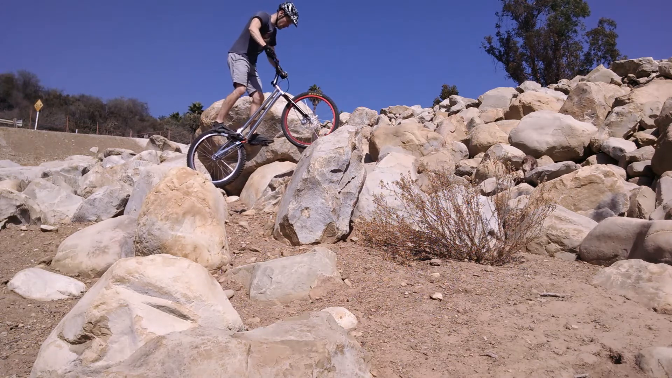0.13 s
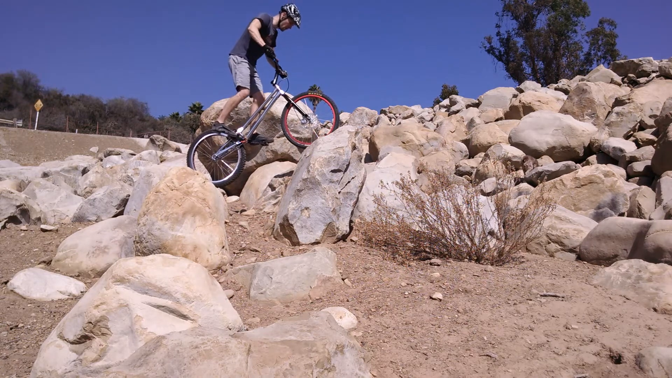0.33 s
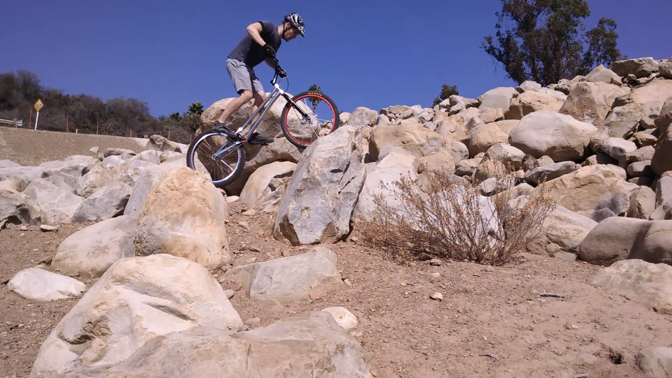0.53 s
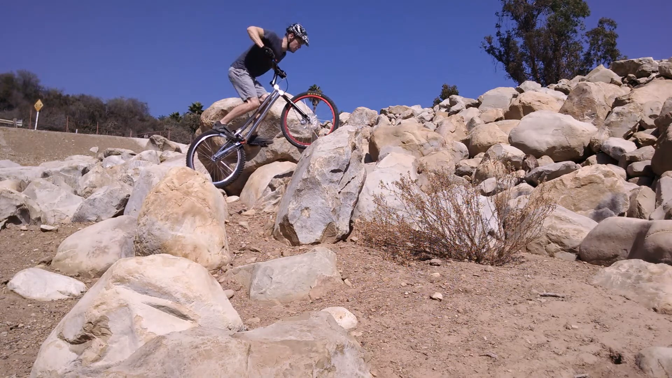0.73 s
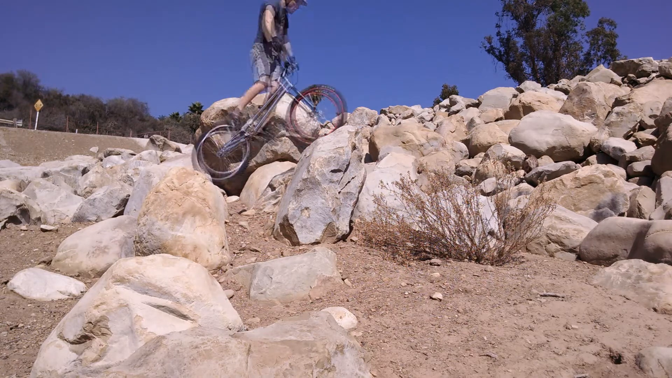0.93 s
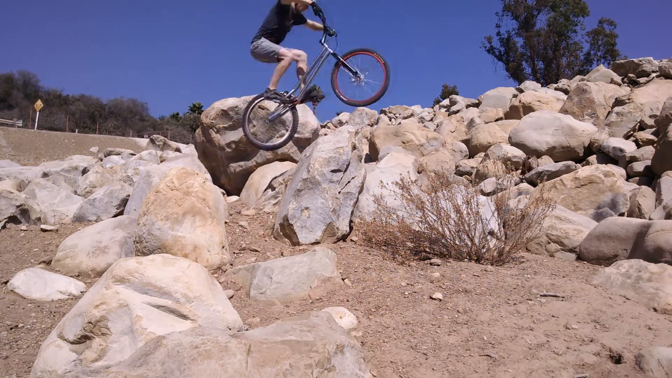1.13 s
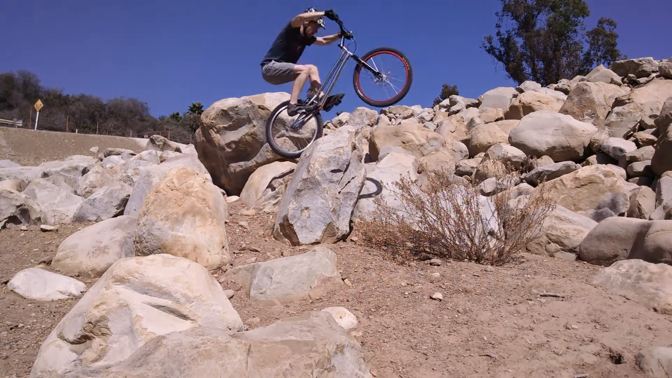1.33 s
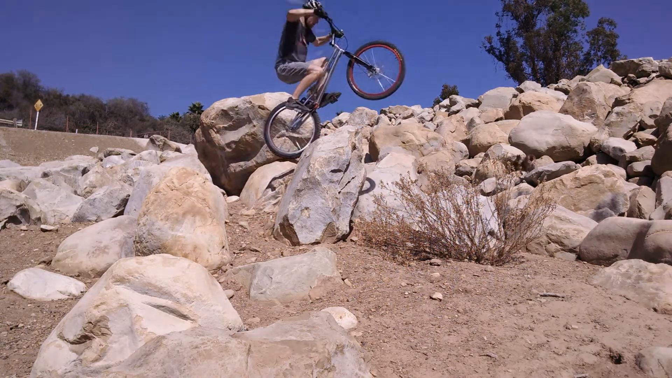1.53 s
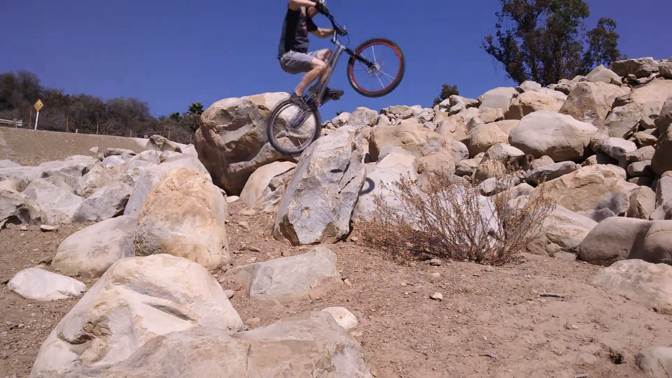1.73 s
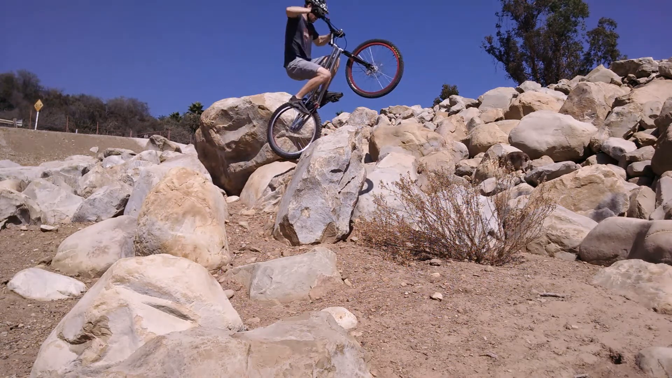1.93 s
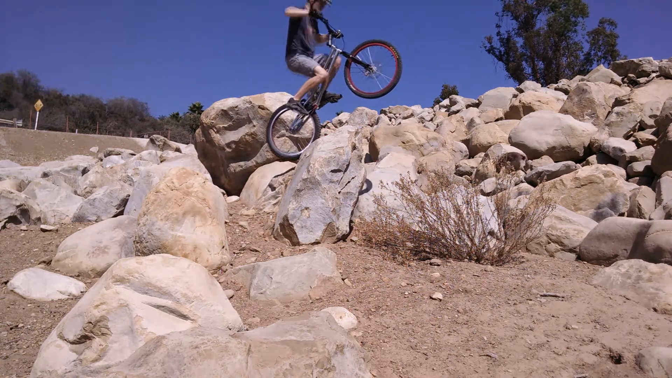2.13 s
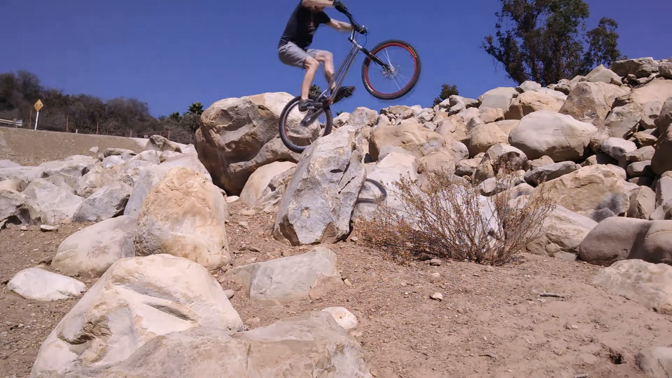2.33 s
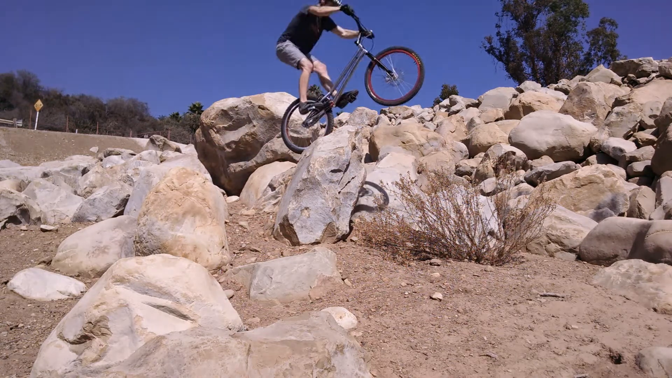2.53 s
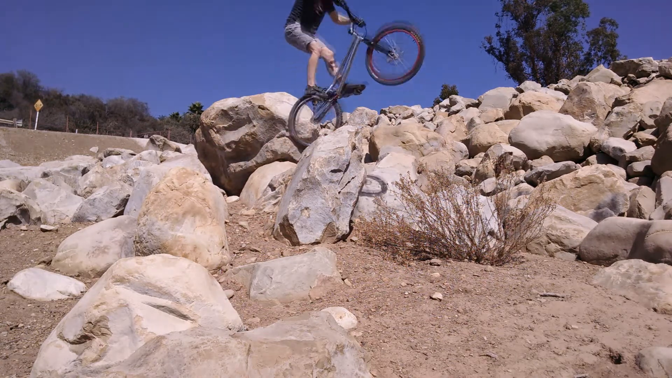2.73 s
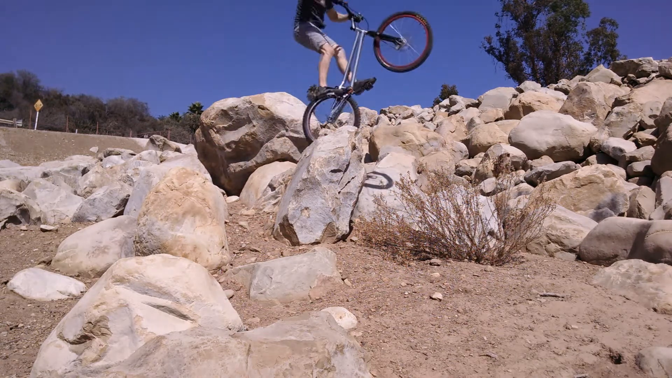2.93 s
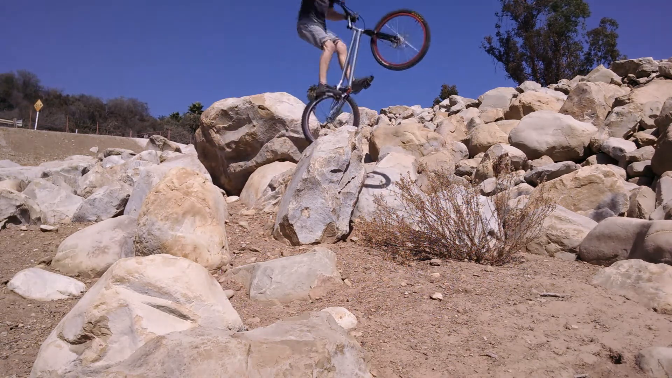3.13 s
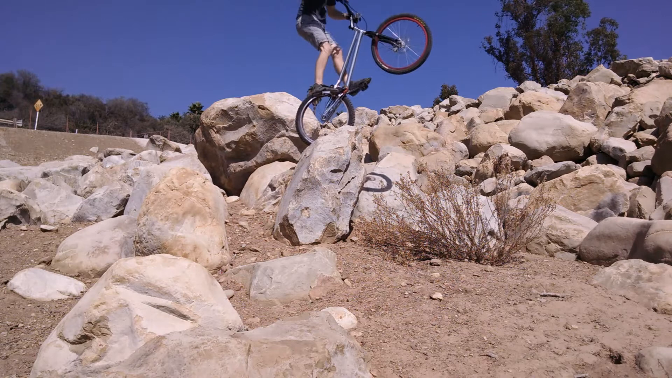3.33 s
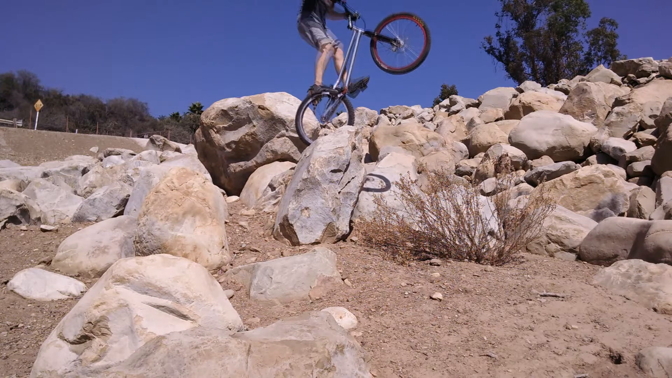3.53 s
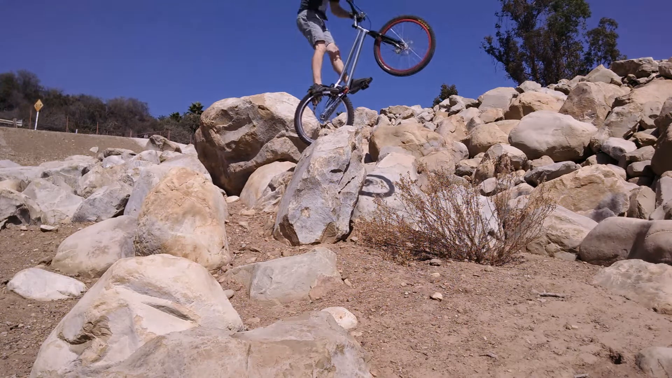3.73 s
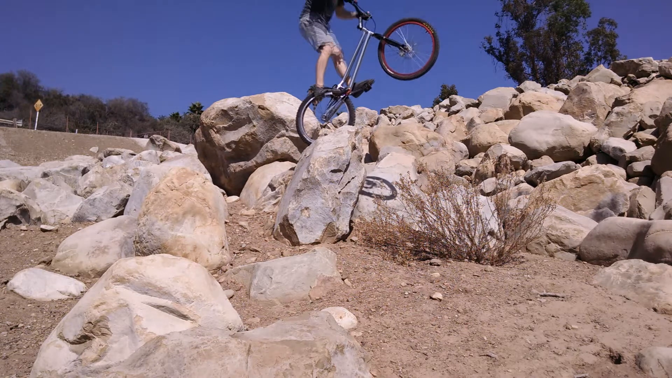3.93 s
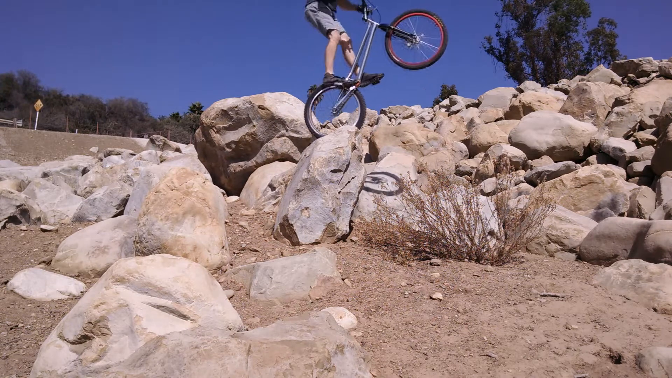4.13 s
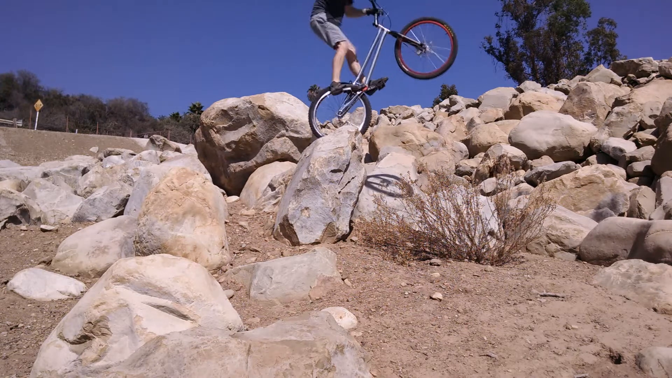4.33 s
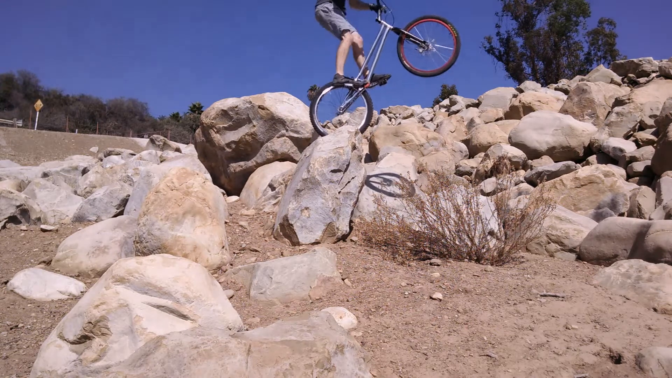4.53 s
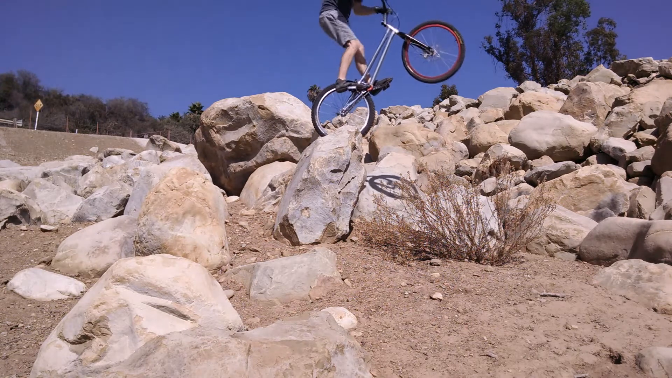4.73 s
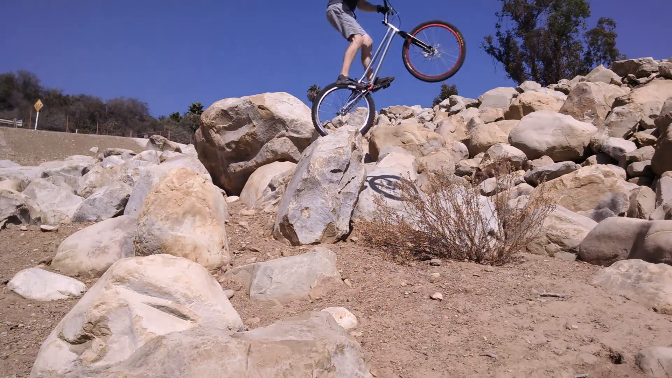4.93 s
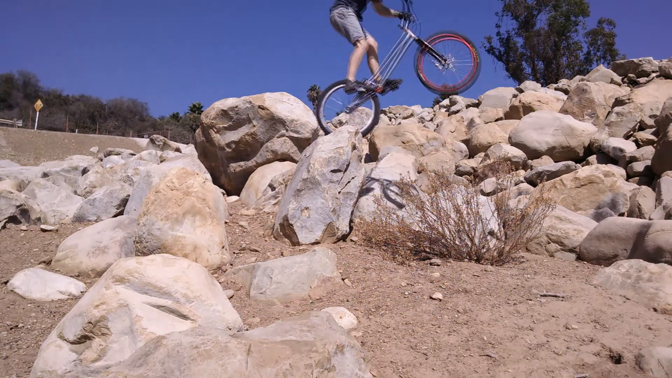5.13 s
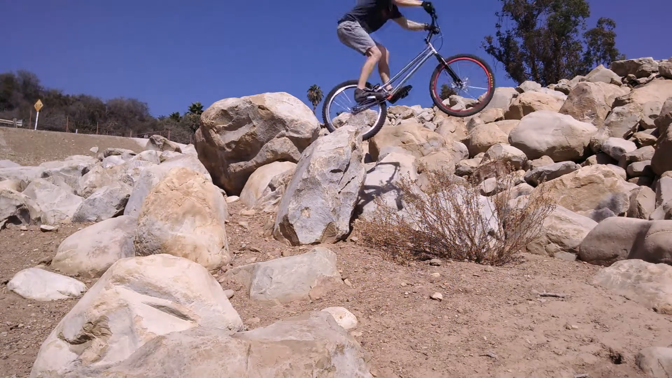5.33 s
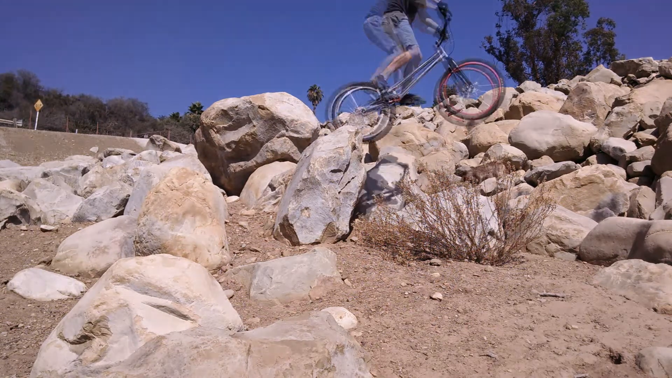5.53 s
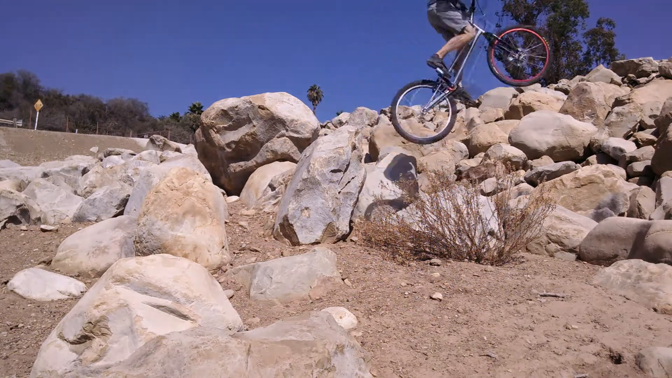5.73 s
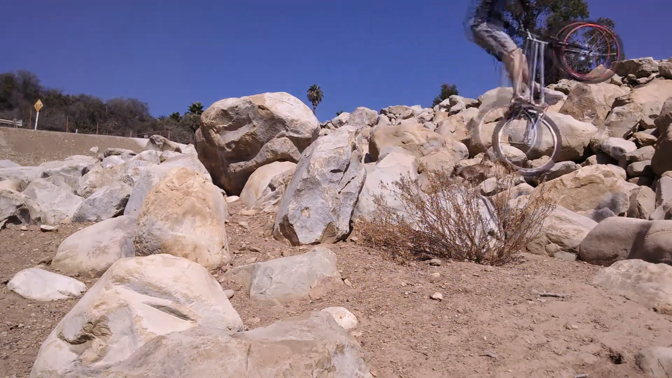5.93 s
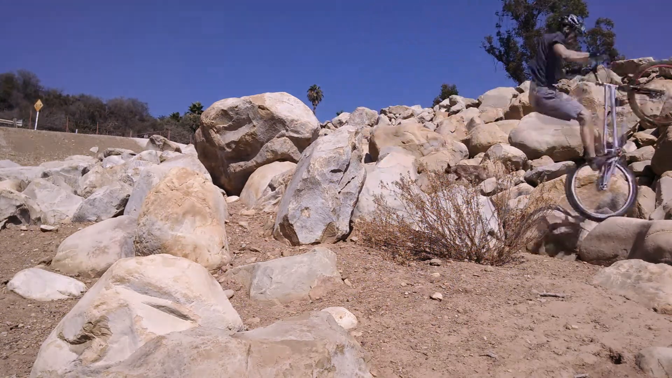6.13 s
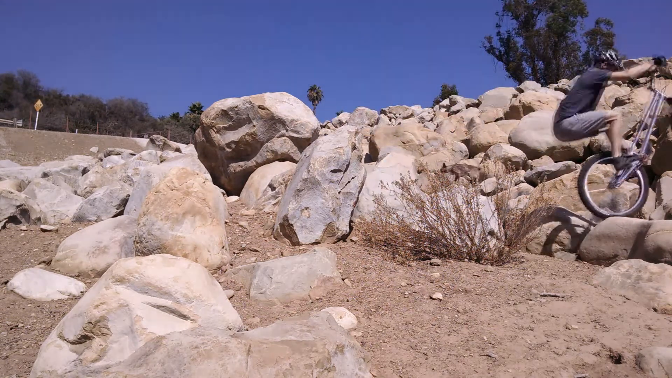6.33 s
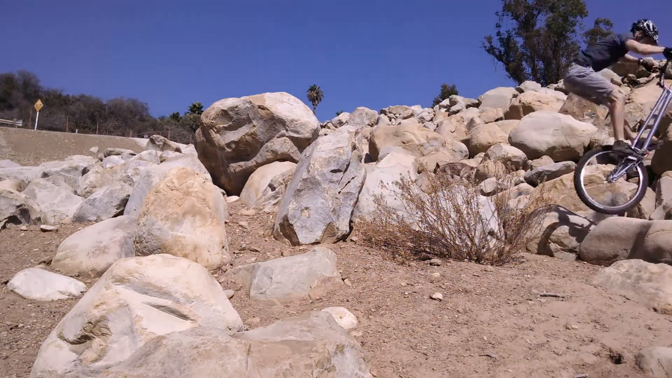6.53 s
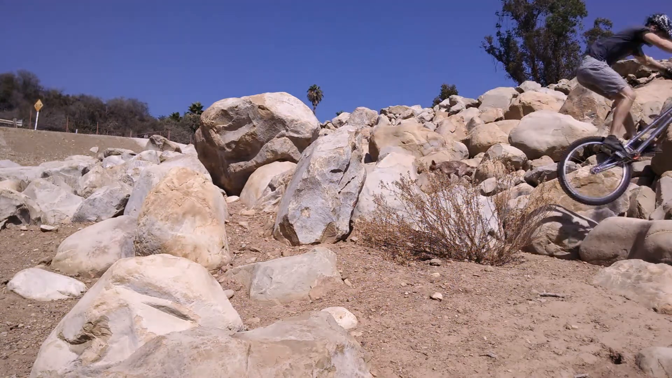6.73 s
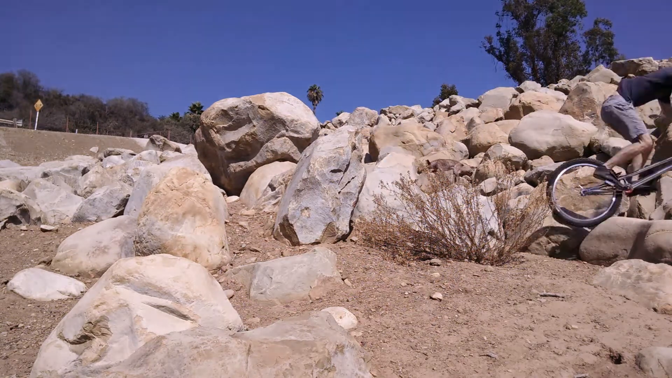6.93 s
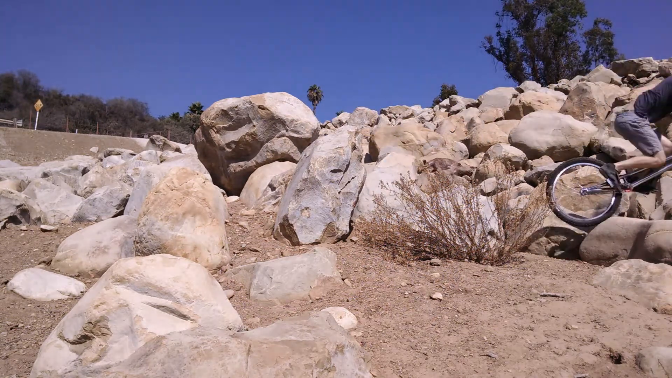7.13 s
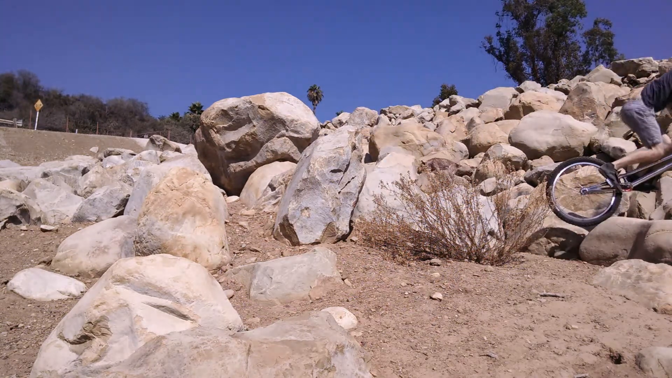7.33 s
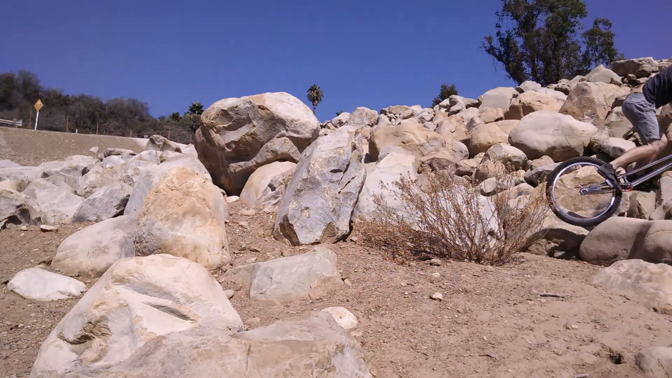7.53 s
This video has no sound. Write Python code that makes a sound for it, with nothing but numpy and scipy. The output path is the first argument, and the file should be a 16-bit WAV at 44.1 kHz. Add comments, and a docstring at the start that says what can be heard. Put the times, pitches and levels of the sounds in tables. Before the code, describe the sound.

Open rocky ground, with a quiet distant hum and low wind thumps, strongest in the first second and again around 2 to 2.7. At about 1 second small hollow tyre taps begin, then quick bright freewheel clicks run into a hard two-tone brake knock at 1.36, with the frame ringing on. Soft scuffs follow at 1.9 and 2.3, a firm tap at 2.47, and a stronger rubbery scrape at 2.8. Ratchet clicks lead to another stuttering brake bark at 3.03. Isolated ticks follow; from 4.1 to 4.35 a scuff, wavering groans and softer brake honks. A tap sounds at 4.7, a cluster of clicks at 5.2 to 5.4, and a loud snap at 5.77. A fast whir precedes the landing at 6.1, with brake chirps, crack and grit. Small taps and sparse ticks fade into near quiet until a tap and sharp, higher brake squawk at 7.1, ringing off by 7.5.

```python
"""Trials bicycle among boulders

A trials bicycle hops up boulders in open country. Freewheel pawls strike their ratchet as clicks and
whirs, the tyre scuffs on rock as noise through resonances, and small taps and groaning tones join in.
The rim brake sticks and slips in short pitched knocks; modal resonators keep the frame ringing.
Boulders answer with a short diffuse echo. Wind noise buffets two microphone ports against each other
over a quiet far hum."""
import sys
import numpy as np
from scipy import signal
from scipy.fft import rfft, irfft, next_fast_len
from scipy.io import wavfile
from scipy.ndimage import map_coordinates

SR = 44100
rng = np.random.default_rng(int(sys.argv[2]) if len(sys.argv) > 2 else 0)


def to_wav(sig):
    """Store sig (one row per channel, or 1-D mono) as 16-bit WAV at the path in sys.argv[1].

    Samples outside -1..1 are clipped; the rate is SR.
    """
    pcm = np.clip(np.atleast_2d(sig), -1, 1) * 32767
    pcm = np.round(pcm).astype(np.int16)
    wavfile.write(sys.argv[1], SR, pcm.T)  # frames by channels


N = 333616


def amp(db):
    """The decibel law: 20 dB is a factor of ten in amplitude."""
    return 10 ** (np.asarray(db) / 20)


def unit(x):
    """Normalisation by mean power: the result has rms 1."""
    return x / np.sqrt(np.mean(x ** 2) + 1e-20)


def along(points, hz):
    """Interpolation on a logarithmic frequency axis through (Hz, value) points."""
    f, v = np.transpose(points)
    return np.interp(np.log(hz + 1), np.log(f + 1), v)


def curves(rows, outside=None):
    """Linear interpolation in time: one value per sample for each column after the seconds."""
    s, *cols = np.transpose(rows)
    return [np.interp(np.arange(N) / SR, s, c, outside, outside) for c in cols]


def wobble(rate):
    """Band-limited fluctuation: a smooth curve through random knots, rate of them a second."""
    knots = rng.standard_normal(int(N * rate / SR) + 4)
    return map_coordinates(knots, [np.arange(N) * rate / SR])


def filtered(x, response):
    """Linear filtering: the spectrum of x times a response of frequency, padded against wrap-around."""
    m = next_fast_len(N + SR // 2)
    return irfft(rfft(x, m) * response(np.fft.rfftfreq(m, 1 / SR)), m)[..., :N]


def noise(spectrum):
    """Spectral shaping: white noise coloured by (Hz, dB) points and scaled to rms 1."""
    return unit(filtered(rng.standard_normal(N), lambda hz: amp(along(spectrum, hz))))


def ports(mid, side):
    """Sum-and-difference stereo: left and right are mid plus and minus side."""
    return np.array([mid + side, mid - side])


def pair(mid_spectrum, side_spectrum, side_db):
    """Partial coherence: one noisy source reaches both ports, partly alike and partly independent."""
    alike = 0.39  # share of the side's power that is the mid's noise turned a quarter cycle
    white, other = rng.standard_normal((2, N))
    turned = np.sqrt(alike) * filtered(white, lambda hz: 1j) + np.sqrt(1 - alike) * other

    def colour(x, spectrum):
        return unit(filtered(x, lambda hz: amp(along(spectrum, hz))))

    return ports(colour(white, mid_spectrum), amp(side_db) * colour(turned, side_spectrum))


def decaying(strikes, t60):
    """Exponential decay: every strike starts an envelope that falls 60 dB in t60 seconds."""
    return signal.lfilter([1], [1, -amp(-60 / (t60 * SR))], strikes)


def wind():
    """Turbulence: lumpy low noise with single pops, pressing mostly oppositely on the two ports."""
    # Each row: time in seconds, level in dB.
    gusts = [(0.0, -40.5), (0.2, -34.5), (0.4, -44), (0.6, -37.5), (0.85, -41.5), (1.2, -53.5), (1.4, -43),
             (1.6, -60), (2.0, -38.5), (2.6, -40.5), (2.8, -49), (3.4, -50), (4.0, -59), (5.0, -59.5),
             (5.2, -53), (5.4, -57), (6.8, -63.5), (7.56, -59.5)]
    # Each row: frequency in Hz, relative density in dB per Hz.
    buffet = [(12, -27.5), (20, 6), (87, -4), (115, -12), (157, -22), (223, -26), (474, -46.5), (500, -37),
              (650, -65.5), (1100, -120)]
    # Single eddies. Each row: centre in seconds, level in dB, pitch in Hz.
    eddies = [(0.136, -15, 138), (0.244, -23, 60), (0.468, -26.5, 90), (0.634, -31, 90), (0.749, -29.5, 91),
              (1.994, -31, 90), (2.078, -32, 88), (2.251, -27, 79), (2.499, -34, 80), (2.685, -27.5, 94),
              (3.263, -36, 70), (3.643, -32.5, 70)]
    lumps = amp(curves(gusts)[0]) * unit(amp(3.3 * wobble(2.9)))
    t = np.arange(N) / SR
    pops = np.zeros(N)
    for s, db, hz in eddies:
        bell = np.exp(-((t - s) * hz * 1.44) ** 2)  # about one cycle long
        pops += amp(db) * bell * np.sin(2 * np.pi * hz * (t - s))
    side = lumps * noise(buffet) + pops
    mid = amp(-17) * lumps * noise(buffet) - amp(-20) * side
    return ports(mid, side)


def air():
    """Diffuse ambience: independent mid and side noises make a far hum that sinks after 6.1 s."""
    # Each row: time in seconds, level in dB before the drift.
    hum = [(0.0, -65), (0.95, -65), (1.1, -62.5), (5.52, -63), (6.09, -65), (6.49, -75.5), (7.56, -69.5)]
    # Sum of the ports, then their difference. Each row: frequency in Hz, relative density in dB per Hz.
    hum_mid = [(15, -40), (25, -7.5), (70, -8), (120, -3.5), (256, -9.5), (503, -3.5), (1130, -10.5),
               (2410, -16.5), (3080, -22), (4250, -17), (5880, -24), (9570, -23.5), (12900, -30.5),
               (14000, -33.5), (15300, -24.5), (15900, -50.5)]
    hum_side = [(120, -34), (200, -6.5), (601, -11), (1300, -23.5), (1480, -35.5), (1810, -24), (2910, -17),
                (4430, -24.5), (9750, -26.5), (14300, -30.5), (16000, -50)]
    drift_db = 1.0 * wobble(9)  # a small random drift
    level = amp(curves(hum)[0] + drift_db)
    return level * ports(amp(0.5) * noise(hum_mid), amp(-2) * noise(hum_side))


def tyre(x):
    """Modal resonance: broad second-order resonances of tyre and rim, alternating in sign."""
    # Each row: centre in Hz, width in Hz, gain in dB.
    modes = [(613, 42, 1.5), (925, 100, 1.5), (1254, 170, 2), (1467, 120, 3.5), (1743, 120, 1),
             (2190, 340, -5)]

    def response(f):
        total = 0
        for k, (c, w, db) in enumerate(modes):
            total = total + (-1) ** k * amp(db) * 1j * f * w / (c * c - f * f + 1j * f * w)
        return total

    return filtered(x, response)


def scuffs():
    """Friction noise: uneven slips of the tread excite the tyre's resonances and loosen grit."""
    # Each row: start in seconds, loudest moment in seconds, level in dB, grit over it in dB,
    # t60 of the rubber's fade in seconds.
    dragged = [(0.945, 0.947, -60.5, -6.5, 1.2), (1.88, 1.92, -52.5, -6, 0.23),
               (2.25, 2.271, -46.5, -14.5, 0.16), (2.27, 2.3, -49, -20, 0.084),
               (2.755, 2.788, -32.5, -15, 0.11), (2.78, 2.801, -34.5, -41, 0.11),
               (4.11, 4.186, -39.5, -7, 0.35), (5.545, 5.545, -59.5, -8, 3.1), (6.088, 6.089, -40, 6, 0.12),
               (6.245, 6.262, -52.5, -5, 0.24), (6.676, 6.711, -74, 5, 0.088), (6.99, 7.06, -74, 8, .1),
               (7.066, 7.085, -52, 7, .15)]
    # Each row: frequency in Hz, relative density in dB per Hz.
    grit_spectrum = [(2500, -14.5), (3400, -5), (4300, -3.5), (7000, -11), (11000, -20), (15000, -31)]
    start_db, grit_lingers = -27, 1.83  # where a drag swells from; the grit's fade over the rubber's
    chance = rng.random(N) < 600 / SR  # 600 slips a second on average
    slips = decaying(chance * amp(1.5 * rng.standard_normal(N)), t60=.015) + .6
    rubber = unit(tyre(slips * rng.standard_normal(N)))
    grit = unit(slips) * pair(grit_spectrum, grit_spectrum, side_db=-0.9)
    t = np.arange(N) / SR

    def drag(start, top, t60):
        swell_db = start_db * (top - t) / (top - start)
        fade_db = -60 * (t - top) / t60
        return (t > start) * amp(np.where(t < top, swell_db, fade_db).clip(-200))

    out = 0
    for start, top, db, grit_db, t60 in dragged:
        gritty = amp(grit_db) * drag(start, top, t60 * grit_lingers) * grit
        out = out + amp(db) * (drag(start, top, t60) * rubber + gritty)
    return out


def frame(x):
    """Modal ringing: whatever shakes the wheel leaves the frame's lightly damped modes sounding."""
    # Each row: frequency in Hz, gain in dB, t60 in seconds.
    modes = [(532, -0.5, 0.75), (531, 4.5, 0.85), (745, 1.5, 1.6), (778, -6.5, 0.7), (1050, -23, 1.8),
             (1044, -23, 1.4), (1540, -10.5, .5), (1605, -14.5, .8), (1690, -14.5, 0.7), (2040, -25, 1.1),
             (2800, 2, .6)]

    def response(f):
        total = 0
        for c, db, t60 in modes:
            w = np.log(1000) / (np.pi * t60)  # bandwidth in Hz that decays this fast
            total = total + amp(db) * 1j * f * w / (c * c - f * f + 1j * f * w)
        return total

    return filtered(x, response)


def rocks(x):
    """Diffuse reverberation: each frequency of the boulders' answer dies at its own speed."""
    # Each row: frequency in Hz, t60 in seconds.
    echo_t60 = [(300, 0.067), (2000, 0.24), (10000, 0.04)]
    hz, t, z = signal.stft(rng.standard_normal((2, SR // 2)), SR, nperseg=256)
    faded = z * amp(-60 * t / along(echo_t60, hz)[:, None])
    tail = signal.istft(faded, SR, nperseg=256)[1]
    late = np.pad(x, ((0, 0), (400, 0)))  # the answer starts 400 samples later
    return signal.fftconvolve(late, tail / np.linalg.norm(tail[0]), axes=1)[:, :N]


def freewheel():
    """Ratchet impacts: each pawl snap is a short ping and a bright rattle of the hub."""
    # Lone pawl clicks. Each row: time in seconds, level in dB.
    clicks = [(0.9453, -44.5), (1.054, -48.5), (1.1114, -44), (1.1243, -38), (1.192, -36.5),
              (1.2196, -37.5), (1.393, -32), (1.4123, -37), (1.454, -52), (1.583, -56), (1.924, -49.5),
              (2.4487, -39), (2.5094, -53.5), (2.575, -53), (2.932, -45), (3.119, -57), (3.329, -58),
              (3.4484, -48), (3.476, -54), (3.5008, -38.5), (3.6856, -34), (3.7136, -44.5), (3.9657, -35.5),
              (4.0847, -56), (4.277, -34), (4.718, -47), (4.7242, -46), (5.1658, -41), (5.169, -40),
              (5.2237, -35.5), (5.228, -37.5), (5.2525, -45.5), (5.2807, -38.5), (5.3254, -35),
              (5.393, -43), (5.5723, -55), (5.7725, -20.5), (6.2544, -70), (6.2737, -39.5), (6.321, -47),
              (6.461, -54.5), (6.5835, -53), (6.6113, -51.5), (6.6234, -56), (6.685, -65), (7.1887, -52.5),
              (7.2132, -55)]
    # One pawl over several teeth. Each row: first click in seconds, last click in seconds,
    # number of clicks, slowing from 0 to 1, level in dB.
    tooth_runs = [(1.144, 1.1886, 4, 0.04, -35.5), (1.2077, 1.327, 5, 0.34, -38),
                  (1.2127, 1.337, 5, 0.05, -35), (2.4682, 2.4902, 2, 0, -34.5),
                  (2.9418, 3.0104, 4, 0.45, -36), (2.9496, 3.02, 4, 0.09, -33.5),
                  (3.9123, 3.932, 3, .25, -39.5), (4.295, 4.314, 2, 0, -34.5),
                  (4.4014, 4.4525, 3, .35, -39.5), (5.2684, 5.3997, 5, 0.1, -34.5),
                  (5.3553, 5.3806, 2, 0.02, -43), (5.824, 5.8756, 3, 0, -49)]
    # Free spins where clicks merge, one list each. Each row: time in seconds, level in dB,
    # clicks per second before the uneven pace, ping over the rattle in dB.
    spins = [
        [(1.125, -49, 204, -0.5), (1.364, -40.5, 220, -6), (1.45, -88, 110, -2)],
        [(2.93, -45.5, 130, -20), (3.03, -43.5, 115, -7), (3.06, -55.5, 140, -12)],
        [(4.282, -60, 85, -9), (4.3, -45, 130, -3), (4.35, -40.5, 88, 4)],
        [(5.828, -39, 190, -29), (6.079, -36.5, 240, -19), (6.1, -25.5, 433, -23)],
    ]
    # Hub rattle, mid and side, then the pawl's broad resonance.
    # Each row: frequency in Hz, relative density in dB per Hz.
    hub_mid = [(290, -42.5), (500, -32.5), (669, -15.5), (763, -25), (1040, -6.5), (1410, -7), (2830, -12),
               (3220, -14), (3460, -5.5), (5680, 1), (12800, -4), (14000, -5), (14800, -4.5), (15500, -5),
               (16200, -34)]
    hub_side = [(290, -52.5), (500, -27), (1080, -32.5), (1830, -29.5), (2950, -8), (4570, -10),
                (5760, 0.5), (6670, -4.5), (10800, -5.5), (12500, -12), (14200, -6), (15500, -23.5),
                (16200, -52)]
    pawl = [(3900, -40.5), (4500, -1.5), (5000, 0.5), (5500, -2.5), (6300, -42.5)]
    tooth_spread_db = 1.2  # teeth differ in strength
    ping_at_40_db, ping_grows, ping_spread_db = -45.5, 0.96, 6.5  # ping of a -40 dB click; grows slower
    snap_t60_s, hub_t60_s, hub_db, snap_rise_s = .018, 0.1, -10, .0006  # snap, and after-rattle under it

    power, ping = np.zeros((2, N + SR))
    t = np.arange(SR // 8) / SR
    strikes = list(clicks)
    for first, last, count, slowing, db in tooth_runs:
        for u in np.linspace(0, 1, round(count)):
            s = first + (last - first) * (u - slowing * u * (1 - u))
            strikes.append((s, db + tooth_spread_db * rng.standard_normal()))
    # the powers of snap and after-rattle add, as for unrelated noises
    decay = amp(-120 * t / snap_t60_s) + amp(2 * hub_db - 120 * t / hub_t60_s)
    snap = decay * (1 - np.exp(-t / snap_rise_s))
    for s, db in strikes:
        ping_db = ping_at_40_db + ping_grows * (db + 40) + ping_spread_db * rng.standard_normal()
        i = round(s * SR)
        power[i:][:len(t)] += amp(2 * db) * snap
        ping[i:][:len(t)] += amp(ping_db - 60 * t / 0.028) * (1 - np.exp(-t / 0.0013))

    size, pace = amp(2.0 * rng.standard_normal(N)), amp(4.7 * wobble(60))
    for rows in spins:
        db, rate, ping_db = curves(rows, outside=-200)
        passed = np.cumsum(np.maximum(rate, 0) * pace / SR) // 1
        teeth = np.diff(passed, prepend=0)  # one strike per tooth passed
        whir = amp(db) * (decaying(teeth * size, t60=0.011) + 0.3)
        power[:N] += whir ** 2
        ping[:N] += amp(ping_db) * whir
    rattle = np.sqrt(power[:N]) * pair(hub_mid, hub_side, side_db=-0.5)
    return rattle + ping[:N] * pair(pawl, pawl, side_db=-7.5)


def taps():
    """Impact excitation: small blows of tyre, chain and pedals puff noise through the wheel and a tone."""
    # Each row: time in seconds, level in dB, tone in Hz.
    blows = [(0.996, -42.5, 1383), (1.05, -36.5, 1320), (1.075, -41.5, 557), (1.092, -42.5, 616),
             (1.581, -41, 1375), (1.716, -48.5, 1365), (1.927, -40, 2250), (1.971, -47.5, 633),
             (2.343, -44, 1050), (2.4, -49.5, 590), (2.472, -26, 1250), (2.507, -56.5, 1370),
             (2.575, -36, 1256), (3.446, -43, 598), (3.499, -41.5, 840), (4.717, -34, 1193),
             (5.546, -38.5, 2070), (5.757, -38.5, 930), (5.774, -36, 1210), (6.249, -38.5, 1220),
             (6.273, -35.5, 945), (6.319, -53.5, 534), (6.39, -55, 1033), (6.461, -63, 544),
             (6.684, -55.5, 1010), (6.717, -59, 505), (6.996, -66.5, 1300), (7.066, -29, 1144),
             (5.118, -56, 1795)]
    t60_s, halves_db = 0.042, 21.5  # length of a -40 dB tap; a tap this much harder is half as long
    tone_db, tilt_db = -0.5, -3  # tone at 1 kHz, and per octave above it: low taps are more of a knock
    puffs, tones = np.zeros((2, N + SR))
    t = np.arange(SR // 4) / SR
    for s, db, hz in blows:
        t60 = t60_s * 2 ** (-(db + 40) / halves_db)
        octaves = np.log2(hz / 1000)
        shape = amp(db - 60 * t / t60) * (1 - np.exp(-t / 0.006))
        i = round(s * SR)
        puffs[i:][:len(t)] += shape
        tones[i:][:len(t)] += amp(tone_db + tilt_db * octaves) * shape * np.sin(2 * np.pi * hz * t)
    return puffs[:N] * unit(tyre(rng.standard_normal(N))) + tones[:N]


def by_grab():
    """Piecewise-constant control: the columns of the latest grab (at first, the first) per sample."""
    # Grabs of the rim brake; tone and noise levels are against the lower tone of a -20 dB slip.
    # Each row: start in seconds, upper tone in dB, knock in dB, crack in dB, left over right of the
    # lower tone in dB, of the upper tone in dB, thud in dB, drive of the frame's ring in dB.
    grab_rows = [(1.34, -5.5, -10, -24, -2, 2.5, -30.5, 3.5), (3.01, -3.5, -14.5, -17.5, -3, 1.5, -50, 1),
                 (4.17, 2.5, -10, -21, -2.5, -1, -45, -2.5), (4.32, 0.5, -6.5, -11, -2.5, 1.5, -38, -1),
                 (6.068, 3.5, -4.5, -5.5, -6, 0.5, -33.5, -6),
                 (7.07, -16, -27, -24.5, -4.5, 11.5, -38.5, -3.5)]
    start, *columns = np.transpose(grab_rows)
    row = np.searchsorted(start, np.arange(N) / SR) - 1
    return np.array(columns)[:, row.clip(0)]


def brake():
    """Stick-slip friction: the pad on the rim gives short two-tone bursts with knock, thud and crack."""
    # Separate slips of the grabs. Each row: loudest moment in seconds, level in dB, lower tone in Hz,
    # upper tone in Hz, t60 in seconds.
    slip_rows = [(1.352, -28.5, 780, 1660, 0.018), (1.359, -24.5, 810, 1643, 0.011),
                 (1.364, -15.5, 825, 1586, 0.018), (1.372, -26.5, 819, 1485, 0.1),
                 (1.395, -34.5, 959.7, 1410, .07), (3.021, -24, 830, 1662, 0.066),
                 (3.029, -15.5, 811, 1616, 0.031), (3.039, -35.5, 849, 1665, 0.22),
                 (3.05, -20.5, 863, 1593, 0.023), (4.19, -33, 911, 1698, .04),
                 (4.202, -27, 856.6, 1556, 0.047), (4.241, -39.5, 870, 1533, 0.083),
                 (4.333, -22, 788, 1609, 0.064), (6.081, -20.5, 756, 1382, 0.028),
                 (6.091, -22, 820, 1618, 0.096), (6.1, -25, 825, 1635, 0.1),
                 (6.122, -35.5, 865, 1716, 0.084), (7.084, -24.5, 1063, 2034, 0.046),
                 (7.092, -13.5, 1109, 2045, 0.013), (7.096, -14, 1052, 2090, 0.057),
                 (7.107, -26, 1029, 2124, 0.023), (7.122, -36, 1038, 2030, .03),
                 (7.138, -29, 1060, 2150, 0.054)]
    # Knock, the tyre's air as it lands, and crack. Each row: frequency in Hz, density in dB per Hz.
    knock_spectrum = [(300, -37), (550, -3.5), (1000, -5), (1500, 4.5), (2400, -2.5), (2900, -23),
                      (3400, -35.5)]
    thud_spectrum = [(20, -1.5), (70, -3.5), (200, -3.5), (330, -10), (500, -33.5)]
    crack_spectrum = [(2300, -32), (2800, 5), (3500, 4.5), (4500, 4.5), (5700, 1), (7100, 3.5), (9500, 2.5),
                      (12500, -17), (15000, -7), (16200, -33)]
    slip_rise_s, first_rise_s = 0.0055, 0.0027  # a grab bites sharply
    noise_grows = 0.85  # the noises grow slower than the lower tone
    upper_grows, upper_lasts = 1.7, .8  # the upper tone grows faster and dies sooner

    t = np.arange(N) / SR
    low, high, noisy = np.zeros((3, N))
    last = 0
    for s, db, _, _, t60 in slip_rows:
        span = slice(round((s - .02) * SR), round((s + .4) * SR))
        u = t[span] - s
        rise = slip_rise_s if s - last < .08 else first_rise_s
        last = s
        shape = np.where(u < 0, np.exp(-2 * (u / rise) ** 2), amp(-60 * u / t60))
        low[span] += amp(db) * shape
        high[span] += amp(upper_grows * (db + 20) - 20) * shape ** (1 / upper_lasts)
        noisy[span] += amp(noise_grows * (db + 20) - 20) * shape
    up_db, knock_db, crack_db, pan_db, up_pan_db, thud_db, _ = by_grab()
    up = amp(up_db) * high

    def turn(column):
        """Phase as the integral of frequency: pitch glides from slip to slip and trembles."""
        times, pitches = np.transpose(slip_rows)[[0, column]]
        hz = np.interp(t, times, pitches)
        return 2 * np.pi * np.cumsum(hz * (1 + 0.0162 * wobble(120))) / SR

    a, b = turn(2), turn(3)
    # the slip is lopsided, so the two tones mix
    mixed = amp(-11.5) * np.sin(a + b) + amp(-40.0) * np.sin(2 * b) + amp(-16) * np.sin(a + 2 * b)
    sides = np.array([[.5], [-.5]])  # half the pan to the left, half off the right
    lower = amp(pan_db * sides) * low * np.sin(a)
    upper = amp(up_pan_db * sides) * up * (np.sin(b) + mixed)
    knock = amp(knock_db) * noisy * noise(knock_spectrum)
    thud = amp(thud_db) * noisy * ports(noise(thud_spectrum), amp(3.5) * noise(thud_spectrum))
    crack = amp(crack_db) * noisy * pair(crack_spectrum, crack_spectrum, side_db=1.6)
    return lower + upper + knock + thud + crack


def groans():
    """Harmonic series: the locked rim groans as it slips, an unsteady tone of eight orders."""
    # One list per groan. Each row: time in seconds, pitch in Hz, level in dB,
    # overtone slope in dB per order.
    slipping = [
        [(2.25, 1073, -64, -6), (2.268, 1110, -43, -22), (2.308, 1080, -41.5, -30), (2.335, 1050, -68, -20)],
        [(2.76, 292.6, -69.5, -0.5), (2.786, 296.4, -48.5, 4), (2.815, 299.5, -56, 4.5), (2.86, 291, -70.5, -2)],
        [(4.11, 717, -68, 2), (4.16, 639, -34.5, -16), (4.2, 539, -43, 0.5)],
        [(4.19, 431.4, -74, -9), (4.202, 438, -46, -11), (4.27, 442.6, -53, -6)],
        [(4.22, 521.5, -42.5, -8), (4.28, 531.4, -54.5, -8), (4.32, 544.5, -63, 6), (4.33, 550, -37, -13)],
    ]
    out = np.zeros(N)
    for rows in slipping:
        hz, _, slope_db = curves(rows)
        db = curves(rows, outside=-200)[1]  # silent outside the groan
        phase = 2 * np.pi * np.cumsum(hz * (1 + 0.0156 * wobble(70))) / SR
        level = amp(db + 4.2 * wobble(60))
        for k in range(8):
            out += level * amp(k * slope_db - 0.66 * k * k) * np.sin((k + 1) * phase)
    return out


def scene():
    """Superposition: the bicycle, its frame's ring and the boulders' answer add to wind and hum."""
    grabs = brake()
    drags = scuffs() + groans() + taps()
    shaking = amp(by_grab()[-1]) * (grabs + amp(5.0) * drags)
    ring = amp(4.1 * wobble(35)) * frame(shaking)  # a random level wobble roughens the ring
    bicycle = freewheel() + grabs + drags + ring
    return bicycle + amp(-16) * rocks(bicycle) + wind() + air()


def record(dry):
    """Partial cancellation: the sum of the two ports has dips; all from 16.5 kHz up is removed."""
    # Each row: centre in Hz, width in Hz, depth in dB.
    dips = [(3280, 380, -3), (14280, 500, -8.5)]
    mid, side = (dry[0] + dry[1]) / 2, (dry[0] - dry[1]) / 2
    mid = filtered(mid, lambda hz: amp(sum(db * np.exp(-((hz - c) / w) ** 2) for c, w, db in dips)))
    return filtered(ports(mid, side), lambda hz: hz < 16500)


dry = scene()
out = record(dry)
to_wav(out)
```